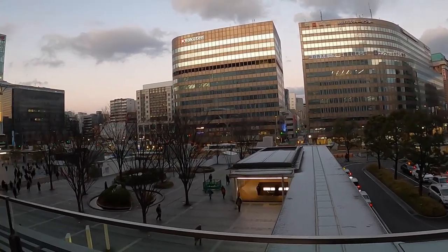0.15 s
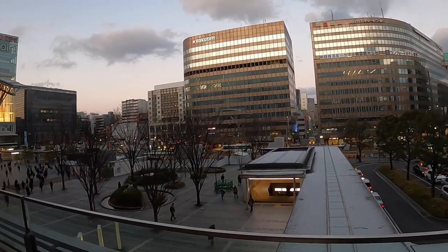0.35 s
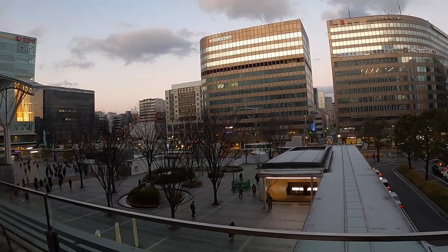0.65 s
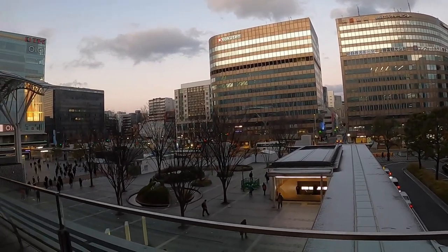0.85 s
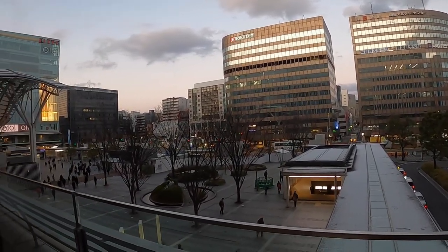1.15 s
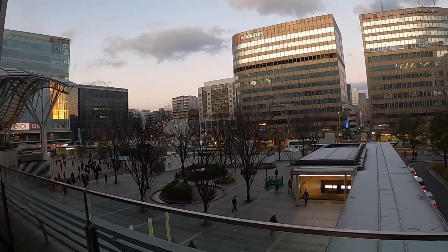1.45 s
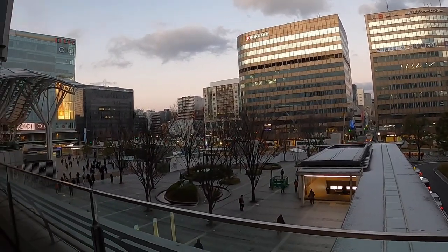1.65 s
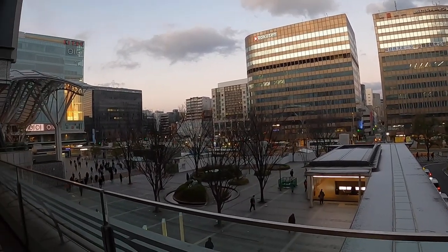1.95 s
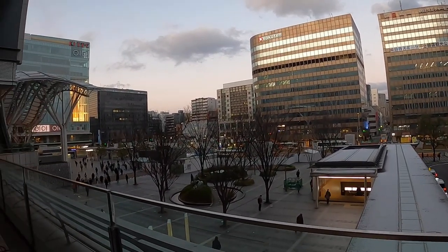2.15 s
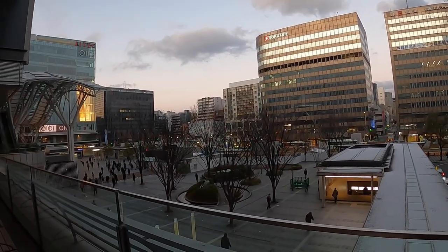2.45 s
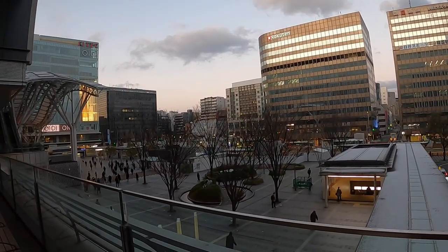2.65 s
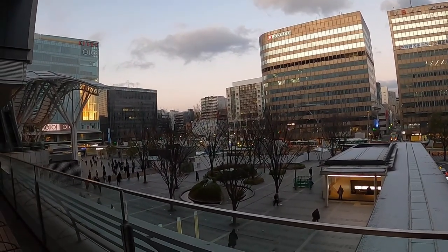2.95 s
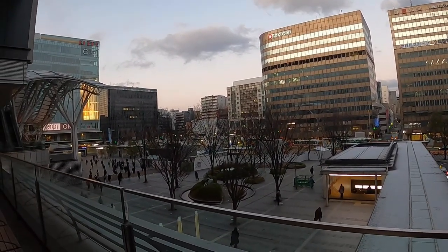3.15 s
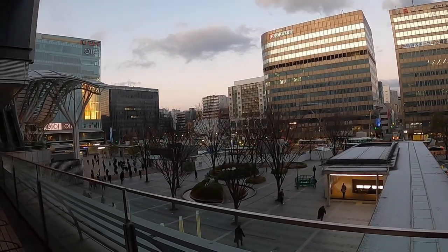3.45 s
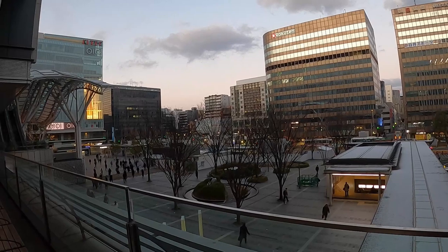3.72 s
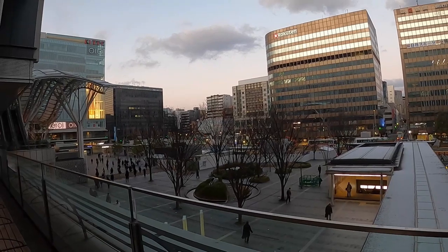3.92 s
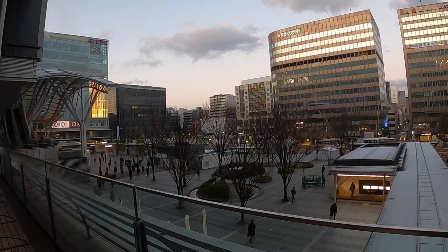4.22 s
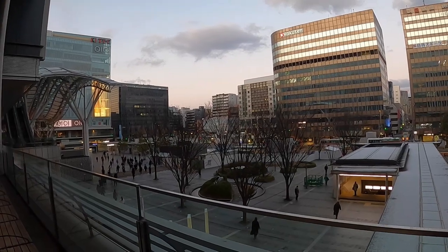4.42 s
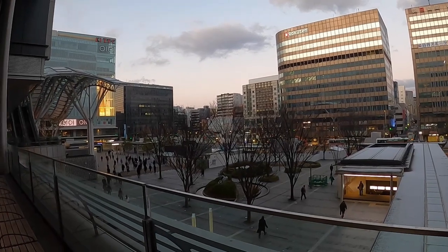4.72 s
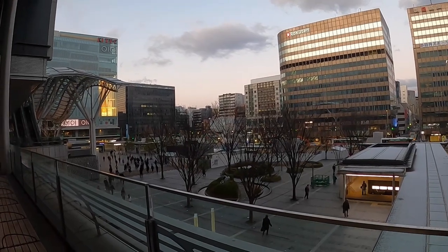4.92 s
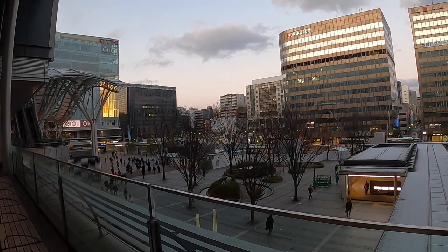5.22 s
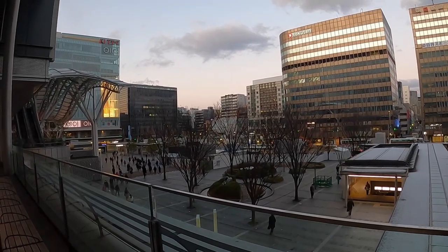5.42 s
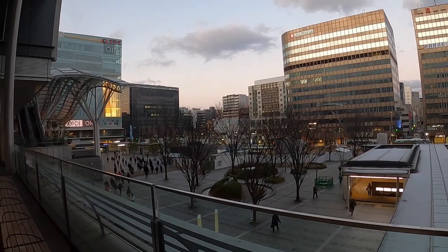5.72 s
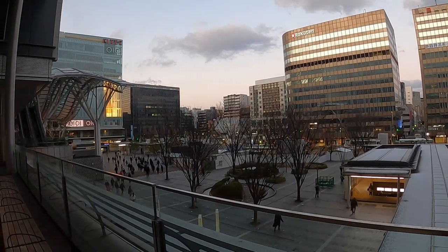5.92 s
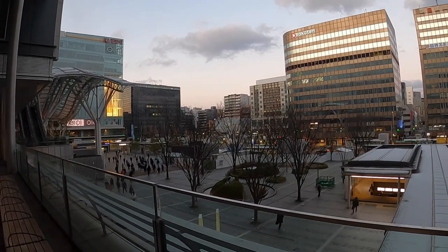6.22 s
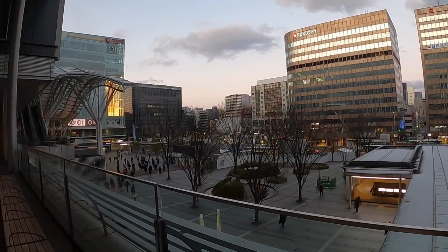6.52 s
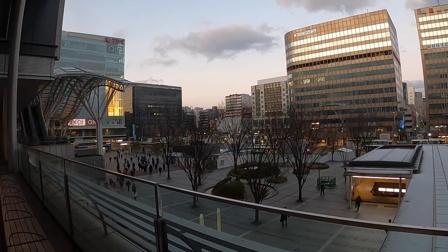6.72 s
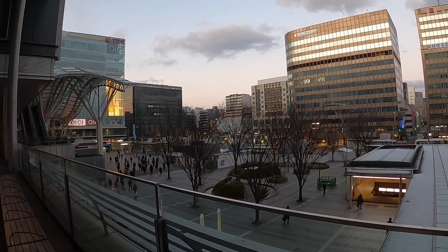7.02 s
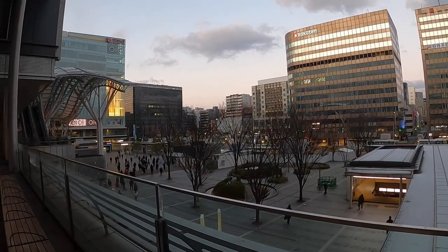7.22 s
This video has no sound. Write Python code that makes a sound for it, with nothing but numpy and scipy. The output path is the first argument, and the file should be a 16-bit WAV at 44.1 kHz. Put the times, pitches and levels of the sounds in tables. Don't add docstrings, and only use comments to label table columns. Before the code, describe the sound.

A windy raised terrace over a city street, captured by a small camera microphone. Throughout, distant cars make an even bed of low engine drone, tyre roar around the middle range and weak, dark hiss, swelling and ebbing slightly. At 0-1 s the street is wide in stereo, with soft low wind thumps and faint brief chirps near 0.3 and 1 s. From 1.1 to 1.8 s a hard gust flutters and pops mainly on the right; the image then narrows, practically mono by 2.4 s. From 2 to 3.6 s moderate low buffeting continues over traffic. Around 3.6-4.2 s an air brake hisses gently as a bus draws near, its airy top briefly wide. From 4.2 to 5 s strong gusts rumble and thud; the sharpest pops burst at 5.4-5.8 s. After 6 s the wind eases to lighter low bumps, traffic swells near 6.8 s, and everything continues to the end at 7.4 s.

```python
import sys
import numpy as np
from scipy import signal
from scipy.io import wavfile
from scipy.ndimage import uniform_filter1d

SR = 44100
rng = np.random.default_rng(int(sys.argv[2]) if len(sys.argv) > 2 else 0)


def convert_level_to_amplitude(level_db):
    exponent = np.asarray(level_db, float) / 20
    return 10 ** exponent


def wav_record(signal):
    frames = np.transpose(np.atleast_2d(signal))
    bounded = np.clip(frames, -1, 1)
    quanta = np.round(bounded * 32767).astype(np.int16)
    wavfile.write(sys.argv[1], SR, quanta)


N = 325017
SIZE, HOP = 1024, 256


def evened(x):
    return x / np.sqrt(np.mean(x ** 2) + 1e-20)


def steadied(x, count):
    return x / np.sqrt(uniform_filter1d(x ** 2, size=count) + 1e-12)


def read(points, hz):
    f, value = np.transpose(points)
    return np.interp(np.log(hz + 1), np.log(f + 1), value)


def follow(rows, t):
    s, *columns = np.transpose(rows)
    return [np.interp(t, s, column) for column in columns]


def grid():
    return np.fft.rfftfreq(SIZE, 1 / SR)[:, None], np.arange(N // HOP + 5) * HOP / SR


def noise(gain):
    a, b = rng.standard_normal((gain.shape[1], gain.shape[0], 2)).T
    x = signal.istft(gain * (a + 1j * b), nperseg=SIZE, noverlap=SIZE - HOP)[1]
    return x[:N] * np.sqrt(3 / 2)


def share(gain, hz, lo_hz, hi_hz):
    inside = (hz > lo_hz) & (hz < hi_hz)
    return gain / np.sqrt(np.sum(gain ** 2 * inside, axis=0))


def lumps(count):
    once = uniform_filter1d(rng.standard_normal(N), size=count)
    return evened(uniform_filter1d(once, size=count))


def fuzzy(hz, width, count):
    r, lead = np.exp(-np.pi * width / SR), 4000
    a, b = rng.standard_normal((count + lead, 2)).T
    slow = signal.lfilter([1], np.convolve([1, -r], [1, -r]), a + 1j * b)[lead:]
    slow = slow / abs(slow) ** .65
    return evened((slow * np.exp(2j * np.pi * hz * np.arange(count) / SR)).real)


# pitch in Hz, width in Hz, level in dB.
WHISTLES = [
    (5925, 25, -86),
    (2085, 15, -74),
]


def whistles():
    return sum(convert_level_to_amplitude(db) * fuzzy(hz, width, count=N) for hz, width, db in WHISTLES)


# centre in seconds, length in seconds, pitch in Hz, width in Hz, level in dB.
TICKS = [(.1925, .004, 8000, 4000, -74), (.98, .022, 3600, 400, -57.5), (1.335, .02, 7310, 150, -74),
         (1.75, .006, 9500, 2500, -77), (3.27, .03, 12000, 1500, -92), (4.17, .02, 13000, 4000, -79.5),
         (2.624, .006, 6200, 2500, -72), (6.225, .005, 6200, 2500, -67), (6.548, .005, 6200, 2500, -64),
         (1.18, .006, 900, 600, -36), (0.25, .02, 4400, 250, -62), (0.37, .025, 4450, 250, -62)]


def ticks():
    out, t = np.zeros(N), np.arange(-2000, 2000) / SR
    for s, length, hz, width, db in TICKS:
        at = round(s * SR) - len(t) // 2
        bell = np.exp(-4 * (t / length) ** 2)
        out[at:at + len(t)] += convert_level_to_amplitude(db) * bell * fuzzy(hz, width, count=len(t))
    return out


# centre in seconds, length in seconds, pitch in Hz, width in Hz, level in dB.
PUFFS = [(.32, 0.22, 4400, 750, -61), (0.52, 0.18, 4450, 700, -65.5), (.8, 1.4, 990, 150, -52),
         (0.14, .08, 1080, 120, -48), (4.5, .6, 590, 200, -51), (5.36, .3, 9700, 900, -80),
         (4.88, .04, 2700, 200, -67), (3.8, .12, 9000, 2300, -79), (3.96, 0.24, 10500, 3000, -75),
         (4.2, .22, 10500, 2900, -78), (3.28, .05, 11000, 2500, -88), (.25, .12, 11000, 2500, -92),
         (1.2, .35, 11000, 2000, -94), (1.17, .4, 5900, 2000, -76), (7.24, .02, 4900, 1200, -68),
         (3.93, .15, 3300, 2800, -58.5), (4.21, .08, 2900, 2300, -57.5), (5.68, .2, 4600, 2500, -65.5),
         (6.74, .14, 4500, 3000, -66), (6.88, .25, 8100, 3000, -78), (0.37, 0.49, 2700, 1200, -59.5),
         (4.8, .9, 12000, 1500, -91.5), (2.25, .1, 8500, 2500, -84), (4.0, .4, 14000, 2000, -93)]


def puffs_power(hz, t):
    power = 0
    for s, length, f, width, db in PUFFS:
        shape = np.exp(-((hz - f) / width) ** 2 * 2)
        power = power + convert_level_to_amplitude(2 * db) * shape / shape.sum() * np.exp(-((t - s) / length) ** 2 * 4)
    return power


# time in seconds, flow in dB, engine load in dB.
TRAFFIC = [(0.0, 2.5, -1.5), (.4, 2, -2.5), (1.0, 1.5, -1.5), (1.4, 1, -1.5), (2.0, -1.5, 1),
           (2.6, -2, 2.5), (3.0, -2, 3.5), (3.4, 1, 1.5), (4.0, -0.5, 1.5), (4.4, 2, 3.5), (4.8, 1, -3.5),
           (5.1, -.5, -0.5), (5.4, -2.5, -6.5), (5.65, 1.5, -5), (5.85, -3, 3.5), (6.05, -2.5, -6),
           (6.8, 4, -1), (7.37, 0, 3)]
# usual level in dB, share of flow, share of engine load,
# dB added by the bus, dB added by its air brake.
LAYERS = [
    (-46, 0.97, 1.12, 1.4, 0.4),
    (-43, 1.19, 0.055, -0.04, 0.8),
    (-54.5, .3, .01, 4.5, -0.6),
    (-67, .4, .01, 2.5, 2.5),
    (-84.5, .3, .01, 1.5, 8),
]


def traffic_db(t):
    arrives_s, approach_s = 4.16, 0.042
    opens_s, rise_s, hold_s, drain_s = 3.6, 0.22, 0.37, 2.6
    flow, load = follow(TRAFFIC, t)
    bus = (1 + np.tanh((t - arrives_s) / approach_s)) / 2
    since = t - opens_s
    draining = 1 - (since - rise_s - hold_s) / drain_s
    air = np.clip(np.minimum(since / rise_s, draining), 0, 1)
    return np.array(LAYERS) @ np.array([1 + 0 * t, flow, load, bus, air])


# frequency in Hz, density in dB per Hz.
STREET = [(120, -22.5), (210, 0.5), (290, 3), (400, -1.5), (550, -3.5), (800, -2), (1020, 0.5),
          (1300, -6.5), (1800, -12), (2400, -18.5), (4400, -32.5), (8200, -45.5), (10500, -52),
          (13000, -75.5)]
# frequency in Hz, side against mid in dB.
SPREAD = [(100, -26.5), (250, -14.5), (450, -13), (900, -7.5), (1500, -5), (2600, -1.5), (4500, 2),
          (8000, 3), (12000, 0)]


def street():
    hz, t = grid()
    levels_db = traffic_db(t)
    bands_hz = [(450, 700), (800, 1400), (1700, 3200), (3500, 7000), (8000, 11000)]
    centres = np.log([550, 1050, 2200, 4800, 9500])
    colour = convert_level_to_amplitude(read(STREET, hz))
    power = puffs_power(hz, t)
    for k, (lo, hi) in enumerate(bands_hz):
        reach = np.interp(np.log(hz + 1), centres, np.arange(len(bands_hz)) == k)
        power = power + reach * (share(colour, hz, lo, hi) * convert_level_to_amplitude(levels_db[k])) ** 2
    patches = rng.standard_normal(power.T.shape).T
    patches = uniform_filter1d(uniform_filter1d(patches, size=14, axis=0), size=14, axis=1)
    patches_db = 0.79 * 1 * evened(patches)
    flicker = lumps(count=1500)[np.minimum(np.arange(len(t)) * HOP, N - 1)]
    flicker_db = 0.8 * flicker * np.clip(hz / 4000, 0, 1)
    gain = np.sqrt(power) * convert_level_to_amplitude(patches_db + flicker_db)
    return noise(gain), noise(gain * convert_level_to_amplitude(read(SPREAD, hz)))


def gusting(rows, t, heave_db, flutter_db):
    s, length, *levels_db = np.transpose(rows)[:, :, None]
    bell = np.exp(-4 * ((t - s) / length) ** 2)
    curves_db = []
    for lull_db, db in zip((heave_db, flutter_db), levels_db):
        power = convert_level_to_amplitude(2 * lull_db) + (convert_level_to_amplitude(2 * db) * bell).sum(axis=0)
        curves_db.append(10 * np.log10(power))
    return curves_db


def buffet(heave_db, flutter_db, lumpy_db):
    hz, t = grid()
    heave = (1 + (hz / 70) ** 4) ** -.7 / (1 + (20 / (hz + 1)) ** 2)
    corner_hz = 200 * convert_level_to_amplitude(0.21 * (flutter_db + 18.0))
    flutter = (1 + (hz / corner_hz) ** 3) ** -.8 / (1 + (95 / (hz + 1)) ** 3)
    heave_db, flutter_db = (np.interp(np.arange(N) / SR, t, db) for db in (heave_db, flutter_db))
    slow = noise(share(heave + 0 * t, hz, 20, 100)) * convert_level_to_amplitude(0.12 * lumpy_db * lumps(count=500))
    strength = np.clip((flutter_db + 38.5) / 12, .2, 1)
    quick = noise(share(flutter, hz, 110, 400)) * convert_level_to_amplitude(lumpy_db * strength * lumps(count=220))
    return convert_level_to_amplitude(heave_db) * steadied(slow, count=3000) + convert_level_to_amplitude(flutter_db) * steadied(quick, count=2500)


def eddies(rows):
    out, t = np.zeros(N + SR), np.arange(-SR // 4, SR // 4) / SR
    for s, length, hz, db in rows:
        width = 100 * 0.5 * (hz / 100) ** 1.35
        at = round(s * SR) + SR // 4
        bell = np.exp(-4 * (t / length) ** 2)
        out[at:at + len(t)] += convert_level_to_amplitude(db) * bell * fuzzy(hz, width, count=len(t))
    return out[SR // 2:][:N]


def pops(rows):
    out, t = np.zeros(N), np.arange(-1000, 1000) / SR
    signs = rng.choice([-1., 1.], (len(rows), 1))
    for (s, db, hz), sign in zip(rows, signs):
        at = round(s * SR) - len(t) // 2
        pulse = np.cos(2 * np.pi * hz * t) * np.exp(-(2.1 * hz * t) ** 2)
        out[at:at + len(t)] += sign * convert_level_to_amplitude(db) * pulse
    return out


def membrane(wind):
    soft = wind / (1 + (wind / .48) ** 4) ** .25
    return signal.sosfilt(signal.butter(4, 1300, fs=SR, output="sos"), soft)


# peak in seconds, length in seconds, slow heave
# in dB, quick flutter in dB.
LONE_GUSTS = [
    (.5, 0.18, -38.5, -62),
    (1.25, 0.17, -23, -34),
    (1.4, 0.17, -20.5, -35.5),
    (1.52, 0.14, -26, -35),
    (1.63, 0.2, -29.5, -45),
    (1.85, 0.29, -31.5, -50),
    (2.3, 0.18, -24.5, -32.5),
]
# time in seconds, peak in dB, pitch in Hz.
LONE_POPS = [(1.095, -22, 200), (1.18, -30, 200), (1.27, -15.5, 220), (1.382, -16, 150), (1.438, -16, 170),
             (1.488, -18, 170), (1.548, -12.5, 240), (1.73, -25, 200), (1.8, -26, 220)]


def lone_wind():
    heave_db, flutter_db = gusting(LONE_GUSTS, grid()[1], heave_db=-46.5, flutter_db=-61)
    return membrane(pops(LONE_POPS) + buffet(heave_db, flutter_db, lumpy_db=3.0))


# peak in seconds, length in seconds, slow heave in dB, quick flutter in dB.
GUSTS = [(0.0, 0.33, -29, -50), (.32, 0.19, -27.5, -44), (.5, 0.15, -33, -47), (.83, 0.26, -32, -39.5),
         (1.27, 0.34, -30, -35), (1.45, 0.13, -27.5, -36.5), (1.72, 0.22, -32, -44),
         (1.95, 0.38, -36.5, -40.5), (2.22, .16, -29, -42), (2.5, 0.16, -32.5, -35), (2.7, .16, -26.5, -38),
         (2.88, 0.13, -30.5, -49), (3.23, 0.21, -30.5, -36), (3.5, 0.24, -46, -39.5),
         (3.83, 0.27, -32, -32.5), (4.29, 0.17, -25, -24), (4.45, 0.23, -22, -23),
         (4.62, 0.17, -24.5, -29.5), (4.8, 0.15, -26.5, -31.5), (5.0, 0.23, -19.5, -26.5),
         (5.25, 0.14, -27.5, -36), (5.45, 0.21, -23, -29), (5.72, 0.28, -25.5, -24.5),
         (5.92, 0.19, -26.5, -41), (6.12, 0.18, -25.5, -40.5), (6.4, 0.15, -28.5, -34.5),
         (6.62, 0.18, -38, -41), (6.95, 0.33, -35, -37), (7.1, 0.19, -30, -40), (7.37, 0.15, -28, -33)]
# centre in seconds, length in seconds, pitch in Hz, level in dB.
SURGES = [(0.333, 0.21, 55.3, -23), (0.805, 0.2, 49.3, -26), (1.2, 0.081, 57, -27), (1.9, 0.054, 60.2, -27),
          (1.647, 0.017, 52, -21.5), (2.27, 0.066, 39, -26.5), (2.71, 0.03, 120.5, -27),
          (3.791, 0.036, 94, -23), (4.249, 0.064, 210, -24), (4.4, 0.075, 165, -25.5),
          (4.54, 0.076, 220, -23), (5.02, 0.1, 135, -28.5), (5.481, 0.034, 520, -34),
          (5.749, 0.1, 570, -30), (4.26, 0.067, 470, -30), (5.13, 0.12, 36, -20), (4.17, 0.082, 110, -25),
          (3.75, 0.041, 120, -29), (1.27, 0.057, 124, -28.5), (5.48, 0.092, 260, -26.5),
          (5.591, 0.055, 201, -22), (5.758, .1, 260, -25.5), (6.01, 0.062, 133, -23.5),
          (6.16, 0.064, 50, -28), (7.051, 0.095, 51.7, -37), (7.31, 0.08, 160.5, -23.5),
          (4.31, 0.073, 128, -22.5), (5.4, 0.11, 105, -24.5), (4.78, 0.13, 118, -27),
          (3.14, 0.063, 170, -33), (7.07, 0.17, 150, -32), (2.19, 0.11, 105, -32), (6.7, .2, 200, -37.5),
          (3.55, 0.16, 205, -36), (3.95, .15, 200, -35.5), (1.12, .15, 260, -41.5), (4.83, .05, 120, -27),
          (2.7, .08, 210, -35), (.55, 0.19, 350, -43.5), (.26, 0.033, 140, -28), (0.47, 0.032, 116, -35),
          (6.43, .04, 121, -29.5), (6.94, 0.033, 129, -33), (4.085, .04, 85, -30), (2.9, .06, 75, -31),
          (3.27, .06, 240, -35), (5.572, 0.045, 88, -21), (5.715, .03, 110, -19)]
# centre in seconds, length in
# seconds, pitch in Hz, level in dB.
MORE_SURGES = [(.2, 0.16, 28, -27), (4.47, .08, 32, -24.5), (1.5, .1, 45, -31), (5.5, 0.11, 200, -28),
               (3.2, 0.14, 200, -36.5), (6.05, .2, 420, -43.5), (5.82, .08, 420, -36), (6.37, 0.085, 110, -33),
               (2.37, .08, 100, -32.5), (2.25, 0.14, 330, -43.5), (.33, 0.088, 210, -38), (2.55, .1, 520, -46)]
# centre in seconds, length in seconds,
# pitch in Hz, level in dB.
LAST_SURGES = [(.02, .05, 40, -29), (.95, .1, 390, -43), (1.03, .08, 330, -43), (1.15, .04, 50, -31),
               (1.82, .06, 70, -33), (3.1, .1, 60, -36), (4.115, .06, 160, -31), (4.125, .06, 60, -30),
               (4.18, .03, 50, -29), (4.385, .045, 205, -25), (4.455, .04, 110, -28), (4.55, .04, 70, -26),
               (4.93, .06, 330, -37), (7.25, .12, 420, -44), (6.25, .1, 300, -43), (2.45, .1, 300, -43),
               (5.462, .04, 110, -25), (5.815, .04, 105, -26), (5.9, .04, 110, -28), (5.42, .04, 480, -38),
               (4.3, .05, 135, -26), (5.7, .08, 200, -28), (4.72, .1, 105, -29), (4.2, .06, 150, -29)]
# time in seconds, peak in dB, pitch in Hz.
POPS = [(4.197, -20, 170), (4.232, -16, 200), (4.245, -21, 300), (4.268, -15, 210), (4.314, -16, 190),
        (4.592, -15.5, 170), (4.915, -21, 318), (5.422, -14, 190), (5.458, -18, 170), (5.558, -19, 200),
        (5.583, -15, 230), (5.615, -16.5, 260), (5.716, -12, 560), (4.33, -28, 278), (4.404, -15, 197),
        (4.449, -13, 300), (4.472, -13, 220), (4.507, -15.5, 310), (4.534, -11.5, 335), (5.02, -12.5, 171),
        (5.476, -16, 417), (5.5, -19, 380), (5.6, -17, 250), (5.707, -14, 298), (5.722, -9, 217),
        (5.761, -7, 240), (5.787, -13.5, 200), (5.81, -12.5, 266), (6.005, -18, 262)]


def shared_wind():
    heave_db, flutter_db = gusting(GUSTS, grid()[1], heave_db=-38, flutter_db=-40.5)
    shed = eddies(SURGES) + eddies(MORE_SURGES) + eddies(LAST_SURGES)
    return membrane(shed + pops(POPS) + buffet(heave_db, flutter_db, lumpy_db=4.0))


def scene():
    mid, side = street()
    mid = mid + whistles() + ticks() + shared_wind()
    lone = lone_wind()
    return np.array([mid + side + .5 * lone, mid - side - 1.14 * lone])


def fizz():
    hz, t = grid()
    gate_hz = 11300
    chance = rng.standard_normal((len(t) // 3 + 1, 8)).T
    chance = uniform_filter1d(chance, size=4, axis=1) + 1.1 * chance[0]
    band = np.clip((hz[:, 0] - gate_hz) // 1300 + 1, 0, 7).astype(int)
    opened = 1 / (1 + np.exp(-8 * (chance - .3)))
    shut_db = -14 * (1 - opened[band][:, np.arange(len(t)) // 3])
    return convert_level_to_amplitude(-102) * noise(share(1. * (hz > gate_hz), hz, gate_hz, 16000) * convert_level_to_amplitude(shut_db))


# from Hz, to Hz, share of time kept.
TOP_BANDS = [
    (10500, 11300, .94),
    (11300, 12800, .66),
    (12800, 15100, .17),
    (15100, 17000, .02),
]


def stepped(x):
    hz, t, z = signal.stft(x, SR, nperseg=SIZE, noverlap=SIZE - HOP)
    gain, block = np.ones(z.shape), np.arange(len(t)) // 4 * 4
    for lo, hi, kept in TOP_BANDS:
        inside = (hz >= lo) & (hz < hi)
        power = uniform_filter1d((abs(z[inside]) ** 2).mean(axis=0), size=3)[block]
        gain[inside] = np.where(power > np.quantile(power, 1 - kept), 1, convert_level_to_amplitude(-11))
    return signal.istft(z * gain, SR, nperseg=SIZE, noverlap=SIZE - HOP)[1][:N]


# time in seconds, level of the side in dB.
WIDTH = [
    (0, -4.5),
    (1.4, -3.5),
    (1.6, -11.5),
    (1.8, -18),
    (2.0, -22),
    (2.4, -36),
    (2.8, -33),
    (7.37, -38.5),
]


def narrowed(side):
    t = np.arange(N) / SR
    treble = signal.sosfilt(signal.butter(1, 13000, "high", fs=SR, output="sos"), side)
    leak = treble * convert_level_to_amplitude(-21.5 + 4 * lumps(count=900))
    top = signal.sosfilt(signal.butter(8, 11800, "high", fs=SR, output="sos"), side) * convert_level_to_amplitude(-2)
    opens, shuts = (np.tanh((t - s) / .025) for s in (3.76, 4.22))
    return side * convert_level_to_amplitude(follow(WIDTH, t)[0]) + leak + top * (opens - shuts) / 2


def band_limit(x):
    return signal.sosfilt(signal.butter(12, 15800, fs=SR, output="sos"), x)


def record(dry):
    mid = stepped((dry[0] + dry[1]) / 2) + fizz()
    side = narrowed((dry[0] - dry[1]) / 2)
    return band_limit(np.array([mid + side, mid - side]))


dry = scene()
out = record(dry)
wav_record(out)
```